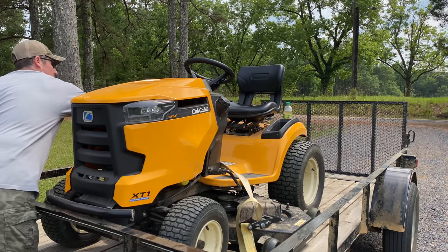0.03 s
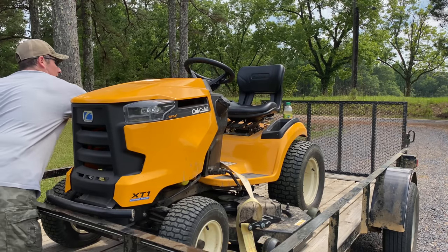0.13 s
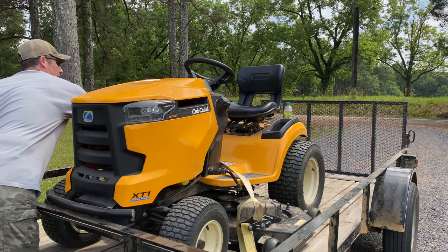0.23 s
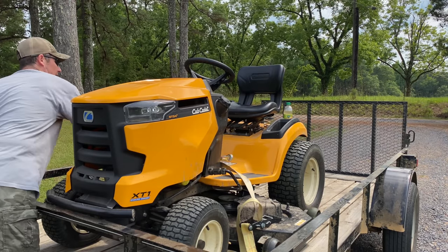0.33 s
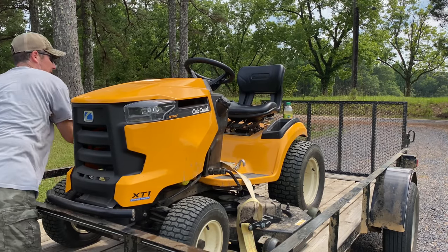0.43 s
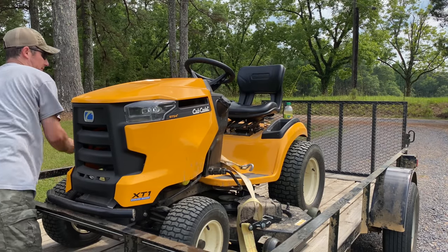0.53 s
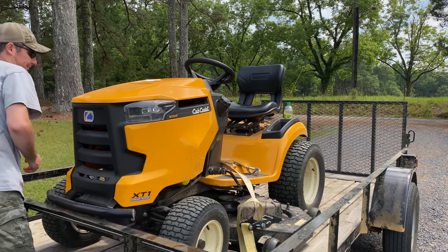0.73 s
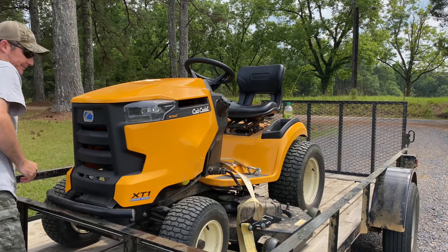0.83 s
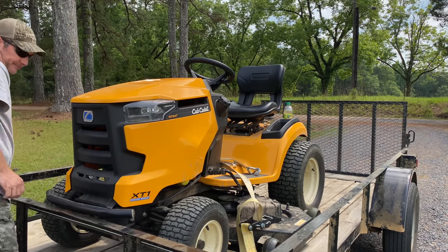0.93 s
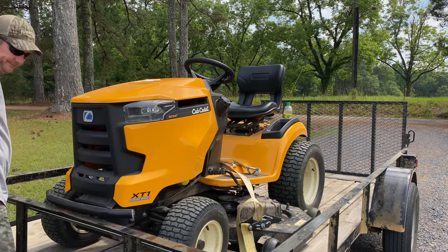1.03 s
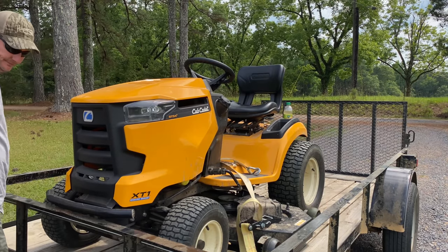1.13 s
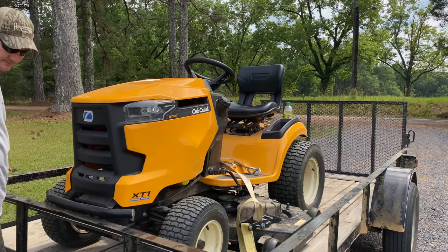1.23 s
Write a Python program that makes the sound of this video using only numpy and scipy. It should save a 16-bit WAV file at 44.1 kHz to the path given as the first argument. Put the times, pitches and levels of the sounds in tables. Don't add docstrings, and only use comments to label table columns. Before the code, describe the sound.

A steel strap hook drops on a metal trailer outdoors. A faint touch and quick jingle near 0.2 s lead to a hard, bright clank at 0.25 s with a short low frame hum. Bounces follow at 0.36 and 0.47 s, a double clack near 0.65 s, clicks around 0.72 s, and tiny taps at 1.0 s. Faint leaves, distant traffic, brief cricket trills and dull tree echo; close stereo pickup.

```python
import sys
import numpy as np
from scipy import signal
from scipy.fft import rfft, irfft, next_fast_len
from scipy.io import wavfile
from scipy.ndimage import uniform_filter1d

SR = 44100
rng = np.random.default_rng(int(sys.argv[2]) if len(sys.argv) > 2 else 0)


def dump_mix(stems):
    frames = np.atleast_2d(stems).T
    limited = np.clip(frames, -1, 1)
    pcm = np.round(limited * 32767).astype(np.int16)
    wavfile.write(sys.argv[1], SR, pcm)


def natural_amplitude(level_db):
    exponent = np.asarray(level_db, float) / 20
    return 10 ** exponent


N = 57330

# f/Hz, density/dB
LEAVES_SPECTRUM = [(230, -30), (450, -6), (820, -4), (1380, -9), (1520, -17), (3500, -17), (3950, -32),
                   (16000, -60)]
# t/s, level/dB
LEAVES_LEVEL = [(0, -56), (0.201, -57), (0.799, -66.5), (1.05, -57.5), (1.12, -63), (1.3, -65.5)]
# f/Hz, density/dB
TRAFFIC_SPECTRUM = [(15, -39), (28, -14), (65, 4), (110, -2), (150, -8.5), (210, -18), (290, -14.5),
                    (420, -54)]
# t/s, level/dB
TRAFFIC_LEVEL = [(0, -52), (.3, -43.5), (.6, -43), (.9, -47.5), (1.3, -47.5)]
# f/Hz, density/dB
HISS_SPECTRUM = [(2500, -28), (4500, 2), (12000, -14), (16000, -23)]
# t/s, level/dB
HISS_COURSE = [(0, -70), (.2, -79), (.85, -88), (1.05, -87), (1.11, -99), (1.3, -101)]
# f/Hz, correlation/1
PORT_LIKENESS = [(30, .9), (350, .75), (1000, .3), (2000, .05), (6500, .05), (8500, .8), (11000, .9)]
# f/Hz, level/dB, fade/(dB/s)
MACHINE_LINES = [(795, -66, 3), (1545, -68, 22)]
# t/s, length/s, level/dB
CRICKET_TRILLS = [
    (.004, .048, -63),
    (.908, .048, -65),
    (1.118, .05, -64),
]
# t/s, f/Hz,
# level/dB, t60/s
KNOCKS_AND_TAPS = [
    (0.176, 190, -38, 0.04),
    (.2185, 920, -27, 0.012),
    (.247, 322, -7.5, 0.072),
    (.365, 580, -18, 0.055),
    (.486, 340, -10.5, .06),
    (0.49, 99.6, -36, 0.068),
    (.47, 470, -23.5, 0.059),
    (.624, 588, -34, 0.11),
    (.658, 320, -21.5, 0.077),
    (.245, 170, -14, .06),
                        (1.011, 510, -41, .03), (1.0125, 620, -46, .03), (1.013, 870, -45, .035),
              (1.0645, 700, -43, .033), (1.066, 790, -44, .028), (.7138, 1780, -28, .032),
              (.716, 2450, -39, .015), (.716, 4600, -42, .012), (.1718, 4000, -51, .006),
              (.1718, 5600, -52, .004), (.7255, 325, -29, .11), (.716, 5700, -43, .01),
              (.716, 3500, -43, .01), (1.021, 1600, -52, .05), (1.024, 2030, -55, .05),
              (1.016, 2850, -52, .03), (1.014, 3800, -55, .025), (1.019, 4350, -59, .02),
              (.769, 1300, -47, .02), (.769, 480, -40, .04)]
# t/s, level/dB, tilt/(dB/octave), decay scale/1, rise/s
CONTACTS = [(0.172, -55, 6, 0.089, 0.00023), (0.2172, -40.5, -4.5, 0.35, 0.0016),
            (0.2427, -7.5, 0, 0.4, 0.00014), (0.2459, -14.5, -3, 1.16, 0.0011),
            (.361, -29, -7.5, 1.76, 0.0019), (.39, -37.5, -6.5, 1.5, .01), (0.419, -44, -2.5, 3.8, 0.02),
            (0.23, -49, -5, 3.3, 0.0071), (.456, -26.5, -5.5, 0.58, 0.00093),
            (0.4674, -18.5, -1.5, 0.48, 0.0028), (.482, -24, -7.5, 0.95, 0.0019),
            (.507, -45, 9.5, 1.2, 0.0036), (0.557, -70, 10, 0.28, 0.00096), (0.6229, -30, -3.5, 1, 0.00057),
            (0.645, -26, -5, 0.76, 0.00087), (.664, -36.5, -14, 0.63, 0.0039),
            (0.7137, -36.5, -5, 0.48, .0003), (.769, -52.5, -4, 0.55, .001), (.79, -49, -7.5, .8, 0.0025),
            (1.0117, -53, -5.5, 0.4, 0.00056), (1.016, -54.5, -4, 0.62, 0.0035),
            (1.03, -57, -5.5, 1.05, 0.0022), (1.282, -77, 9, .5, 0.0032), (0.7221, -43, -4, 0.62, 0.0024),
            (0.718, -41, 1, 0.13, 0.00026), (.499, -29, -6, 0.43, .001), (0.741, -48, -5.5, 1.2, .005),
            (0.81, -55, -5.5, .6, 0.0019)]
# f/Hz, density/dB
SHEET_SPECTRUM = [(70, -54.5), (130, -15), (416, -8), (568, -14), (1350, -10), (2890, -11), (6290, -15),
                  (16400, -23)]
# f/Hz, t60/s
SHEET_DECAY = [(150, 0.098), (350, 0.24), (700, 0.28), (1400, .2), (3700, 0.16), (10000, 0.13)]
# f/Hz, level/dB, t60/s
PANEL_MODES = [(760.7, -8, 0.49), (876, -0.5, 0.04), (984, -14, 0.18), (1122, -7.5, 0.13),
               (1166, -7.5, 0.33), (1294, -0.5, 0.093), (1810, -14.5, 0.077), (2086, -12.5, 0.095),
               (2230, -12.5, 0.057), (3000, -11, 0.1), (3520, -15.5, 0.15), (5900, -16, .08)]
# f/Hz, width/Hz, level/dB
HOOK_MODES = [(1870, 130, 1.5), (2570, 190, 2.5), (3700, 150, -13), (6500, 400, -17), (7800, 300, -19)]
# t/s, level/dB, pitch ratio/1
HOOK_CLACKS = [
    (0.4674, -24, 1.04),
    (0.4716, -17.5, .925),
    (.627, -27, 1.08),
    (0.645, -27.5, 1),
    (0.6484, -17.5, 1.0),
]
# f/Hz, level/dB, t60/s, growth/(dB/s)
JINGLE_MODES = [(3300, -60, .03, 800), (4300, -66, .02, 800), (5450, -52, .035, 150), (6600, -51, .035, 0),
                (8000, -62, .03, 50)]
JINGLE_TIMES = [
    .2205,
    .224,
    .2275,
    .232,
    .2345,
    .238,
]
# t/s, f/Hz, level/dB, t60/s, rise/s
FRAME_HUMS = [(.244, 262, -14, 0.61, .004), (.3585, 261.5, -19, 1.0, 0.036), (.246, 140, -18, 0.62, 0.005),
              (.244, 412, -8.5, 0.086, 0.0022), (.361, 404, -18, 0.254, 0.002),
              (.49, 474, -37, 0.12, 0.0031), (.39, 745, -45, 0.4, 0.0056), (.3603, 140, -32, 0.49, .02),
              (.7255, 261.5, -48, 1.5, .03), (.66, 467, -53, 1.6, .02), (.66, 555, -57, 1.6, .02),
              (.37, 830, -38, .5, .01), (.4, 605, -39, .4, .01)]
# f/Hz, level/dB, t60/s
BLOW_MODES = [(554, -30, .29), (750, -28, .24), (853, -24, .18), (997, -23, .16), (1111, -25, .2),
              (1184, -21.5, .17), (1343, -21, .1), (1600, -23, .08), (1770, -26, .17), (1950, -22, .07),
              (2099, -28, .14), (2271, -23, .12), (2833, -24, .13), (3695, -28, .12)]
# f/Hz, t60/s
TREES_DECAY = [(200, 1.3), (1200, 1.04), (2000, 0.78), (5000, 0.13), (12000, 1.1)]
# f/Hz, gain/dB
TREES_GAIN = [(150, -22.5), (400, -1), (800, -4), (10000, -2)]
# f/Hz, gain/dB
PORT_APART = [(60, -19.5), (250, -10), (1000, -8.5), (3500, -7), (5600, -1), (7000, -18), (9000, -16),
              (14000, -21)]
# f/Hz, gain/dB
PORT_TILT = [(60, -1), (250, -3), (1000, 0.5), (4000, 0.5), (15000, 4)]
# f/Hz, lead/rad
PORT_LEAD = [(0, .1), (7300, .1), (8800, .15 - np.pi), (9450, -np.pi - .15), (10800, -6),
             (11500, -2 * np.pi), (12800, -9.2), (13600, -9.5), (14900, -4 * np.pi)]
# f/Hz, gain/dB
MIC_RESPONSE = [(25, -8), (95, -4), (125, 0), (13500, 0), (15000, -5), (16000, -12), (16500, -60)]


def along(points, hz):
    f, v = np.transpose(points)
    return np.interp(np.log(hz + 1), np.log(f + 1), v)


def unit(x):
    return x / np.sqrt(np.mean(x ** 2) + 1e-20)


def filtered(x, response):
    m = next_fast_len(N + SR // 2)
    return irfft(rfft(x, m) * response(np.fft.rfftfreq(m, 1 / SR)), m)[..., :N]


def add(track, t_s, sound):
    part = track[..., round(t_s * SR):][..., :sound.shape[-1]]
    part += sound[..., :part.shape[-1]]


def ring(hz, db, t60_s, rise_s):
    t = np.arange(SR) / SR
    return natural_amplitude(db - 60 * t / t60_s) * np.sin(2 * np.pi * hz * t) * (1 - np.exp(-t / rise_s))


def dying(colour, t60, size):
    hz, t, z = signal.stft(rng.standard_normal((2, size)), SR, nperseg=256, noverlap=192)
    gain = colour(hz) / np.sqrt(np.mean(colour(hz) ** 2))
    decay = natural_amplitude(-60 * t / t60(hz)[:, None])
    return signal.istft(z * gain[:, None] * decay, SR, nperseg=256, noverlap=192)[1][:, :size]


def opposed(x, gain_db):
    return filtered(x, lambda hz: np.array([[1], [-1]]) * natural_amplitude(gain_db(hz)))


def air(spectrum, level):
    z = signal.stft(rng.standard_normal((2, N)), nperseg=512)[2]
    patches = uniform_filter1d(uniform_filter1d(rng.standard_normal(z.shape[1:]), 5, 0), 12, 1)
    pair = signal.istft(z * natural_amplitude(3.4 * unit(patches)), nperseg=512)[1][:, :N]

    def mid_side(hz):
        angle = np.arccos(np.clip(along(PORT_LIKENESS, hz), -1, 1)) / 2
        return natural_amplitude(along(spectrum, hz)) * [np.cos(angle), np.sin(angle)]

    mid, side = filtered(pair, mid_side)
    course_db = np.interp(np.arange(N) / SR, *np.transpose(level))
    return natural_amplitude(course_db) * unit(np.array([mid + side, mid - side]))


def far_machine():
    t = np.arange(N) / SR
    out = np.zeros((2, N))
    for hz, db, fade_db_s in MACHINE_LINES:
        drift_rad = np.cumsum(rng.normal(0, 0.02, N))
        out += natural_amplitude(db - fade_db_s * t) * np.sin(2 * np.pi * hz * t + drift_rad + [[0], [1]])
    return out


def cricket():
    mode_hz, clicks_per_s, t60_s = 10300, 125, .015
    out = np.zeros(N)
    for t_s, length_s, db in CRICKET_TRILLS:
        for k in range(int(length_s * clicks_per_s)):
            click = ring(mode_hz * rng.normal(1, .004), db + rng.normal(0, 1.9), t60_s, 0.00024)
            add(out, t_s + k / clicks_per_s, click[:2000])
    return out * natural_amplitude([[0], [-3]])


def deck():
    out = np.zeros(N)
    for t_s, hz, db, t60_s in KNOCKS_AND_TAPS:
        add(out, t_s, ring(hz, db, t60_s, t60_s / 20))
    return out


def sheet():
    panel_db, scatter_db = -11.5, 2.5
    out = np.zeros((2, N))
    t = np.arange(SR // 2) / SR
    for t_s, db, tilt, scale, rise_s in CONTACTS:
        crash = dying(lambda hz: natural_amplitude(along(SHEET_SPECTRUM, hz) + tilt * np.log2((hz + 50) / 1000)),
                      lambda hz: scale * along(SHEET_DECAY, hz), len(t))
        for hz, mode_db, t60_s in PANEL_MODES:
            tilt_db = min(tilt, 0) * np.log2(hz / 1000)
            level_db = panel_db + mode_db + tilt_db + scatter_db * rng.standard_normal()
            crash[0] += ring(hz, level_db, t60_s * scale, 0.00029)[:len(t)]
        add(out, t_s, natural_amplitude(db) * crash * (1 - np.exp(-t / rise_s)))
    return out


def hook():
    out = np.zeros(N)
    for t_s in JINGLE_TIMES:
        for hz, db, t60_s, growth_db_s in JINGLE_MODES:
            level_db = db + growth_db_s * (t_s - JINGLE_TIMES[0]) + rng.normal(0, 3)
            add(out, t_s, ring(hz * rng.normal(1, .025), level_db, t60_s, .001))
    for t_s, db, ratio in HOOK_CLACKS:
        for hz, width_hz, mode_db in HOOK_MODES:
            add(out, t_s, ring(hz * ratio, db + mode_db, 1.92 / width_hz, 0.000091))
    return out


def frame():
    blow_s = .2435
    out = np.zeros(N)
    for hz, db, t60_s in BLOW_MODES:
        add(out, blow_s, ring(hz, db, t60_s, 0.003))
    for t_s, hz, db, t60_s, rise_s in FRAME_HUMS:
        add(out, t_s, ring(hz, db, t60_s, rise_s))
    return out


def trees(steel):
    delay_s, level_db, wide_db = .02, -20, 7
    tail = dying(lambda hz: np.ones_like(hz), lambda hz: along(TREES_DECAY, hz), SR)
    late = np.pad(steel, (round(delay_s * SR), 0))
    wet = signal.fftconvolve(late[None], tail / np.linalg.norm(tail[0]), axes=1)[:, :N]
    wet = filtered(wet, lambda hz: natural_amplitude(along(TREES_GAIN, hz)))
    wide = opposed(wet[1], lambda hz: along(PORT_APART, hz) + wide_db)
    return natural_amplitude(level_db) * (wet[0] + wide)


def ports(x):
    side = np.array([[.5], [-.5]])

    def response(hz):
        gain_db = side * along(PORT_TILT, hz) + along(MIC_RESPONSE, hz)
        return natural_amplitude(gain_db) * np.exp(1j * side * along(PORT_LEAD, hz))

    return filtered(x, response)


def scene():
    background = air(LEAVES_SPECTRUM, LEAVES_LEVEL) + air(TRAFFIC_SPECTRUM, TRAFFIC_LEVEL)
    background = background + air(HISS_SPECTRUM, HISS_COURSE) + far_machine() + cricket()
    direct, other = sheet()
    steel = deck() + direct + hook() + frame()
    apart = opposed(other, lambda hz: along(PORT_APART, hz))
    return background + steel + apart + trees(steel)


def top_cut(x):
    return signal.sosfilt(signal.butter(12, 16550, fs=SR, output="sos"), x)


def record(dry):
    ceiling = .95
    x = ports(dry)
    mix = x / (1 + np.abs(x / ceiling) ** 8) ** (1 / 8)
    return top_cut(mix)


dry = scene()
out = record(dry)
dump_mix(out)
```